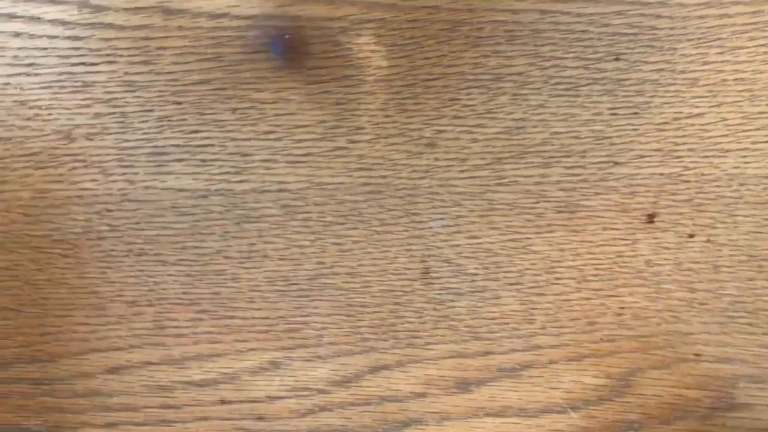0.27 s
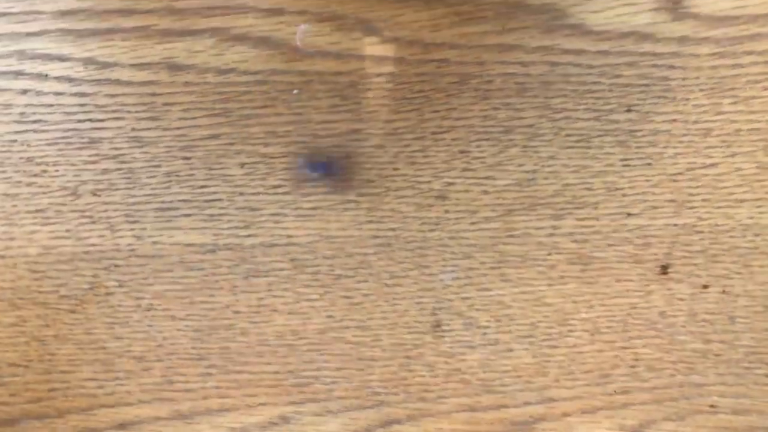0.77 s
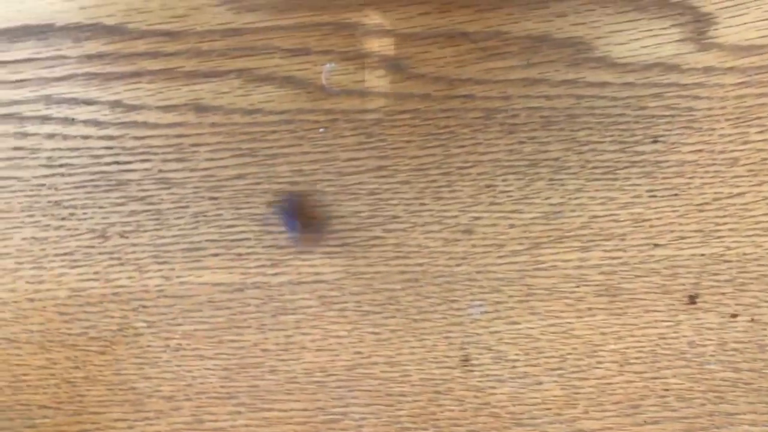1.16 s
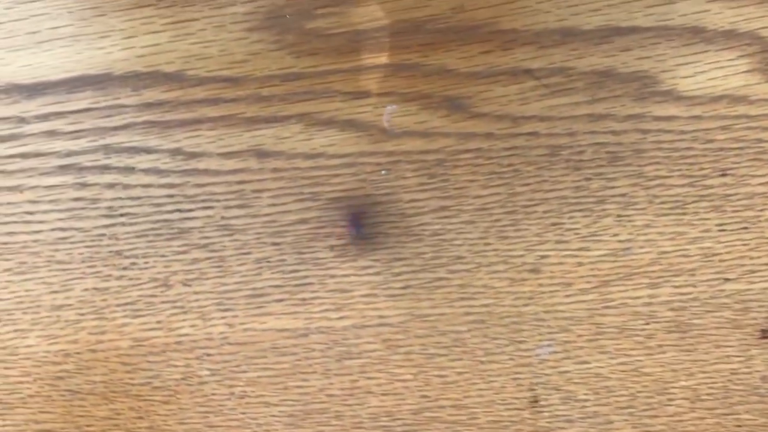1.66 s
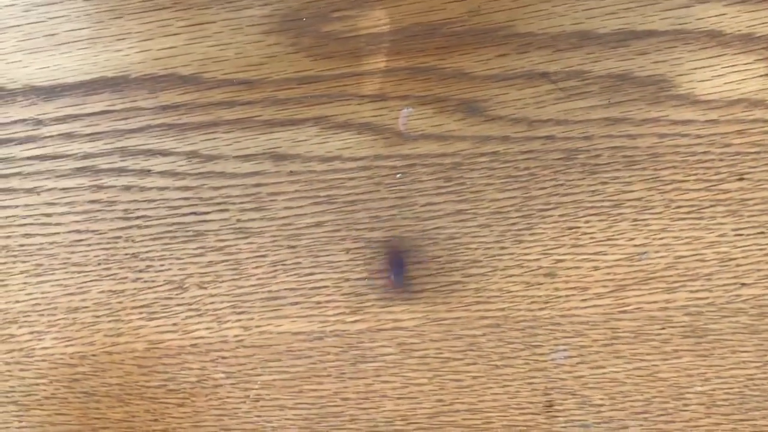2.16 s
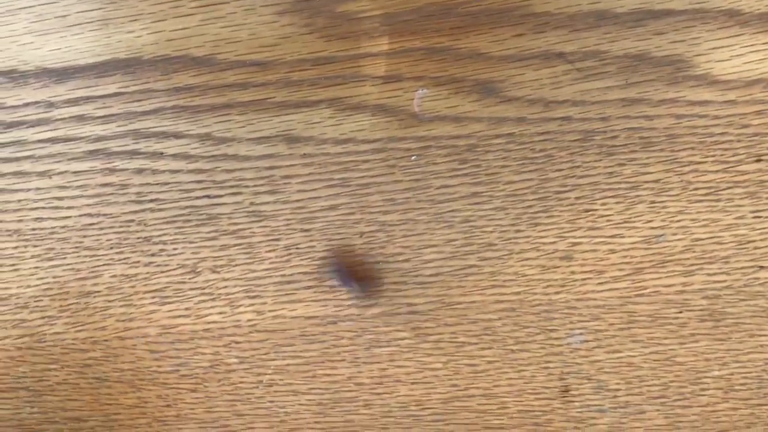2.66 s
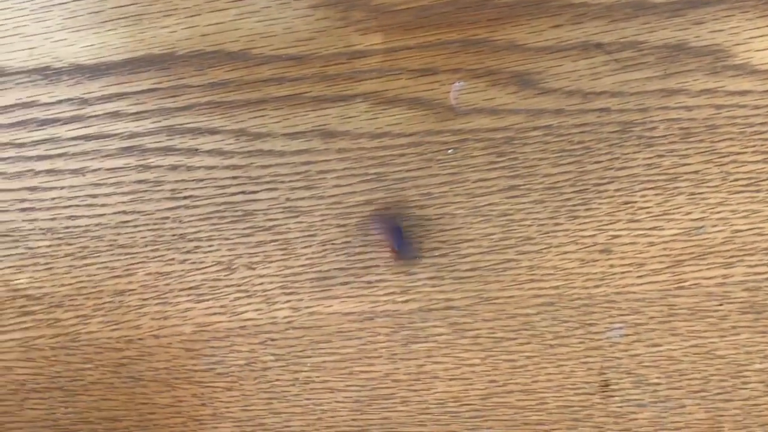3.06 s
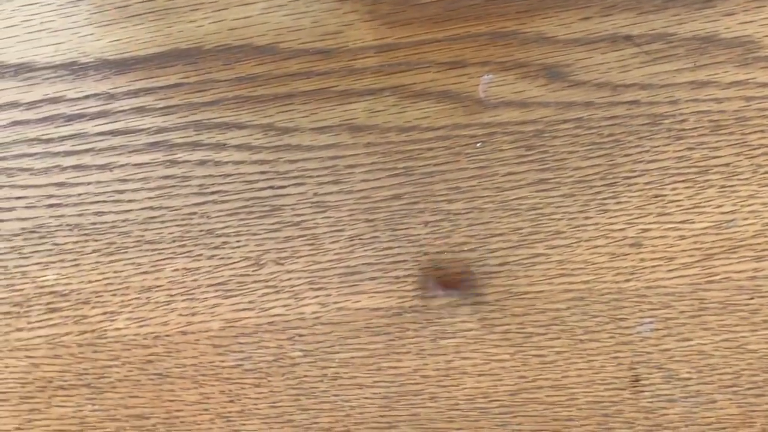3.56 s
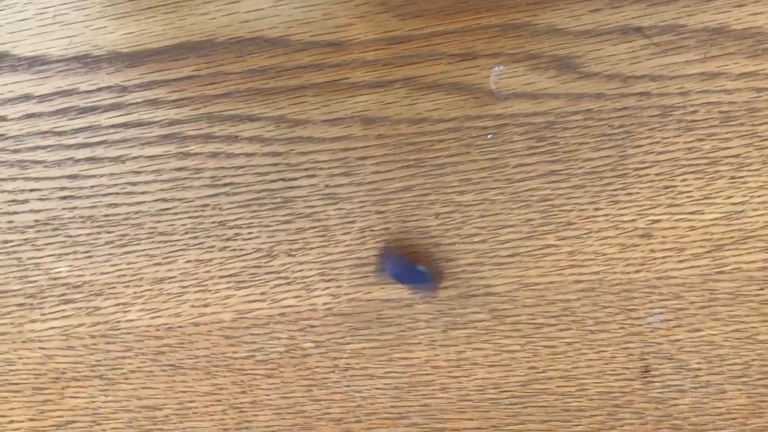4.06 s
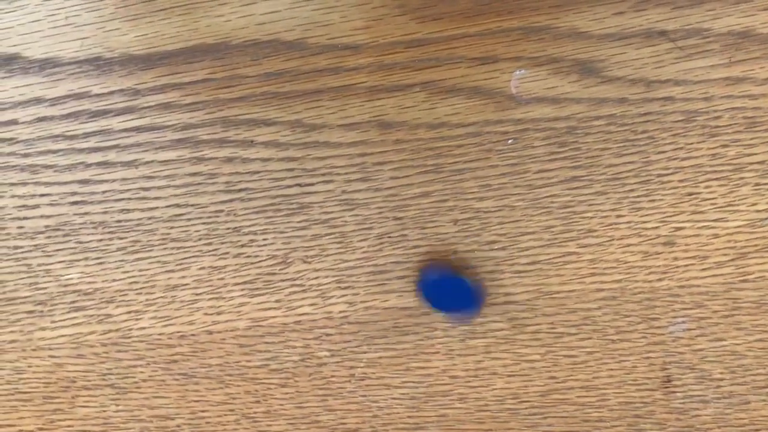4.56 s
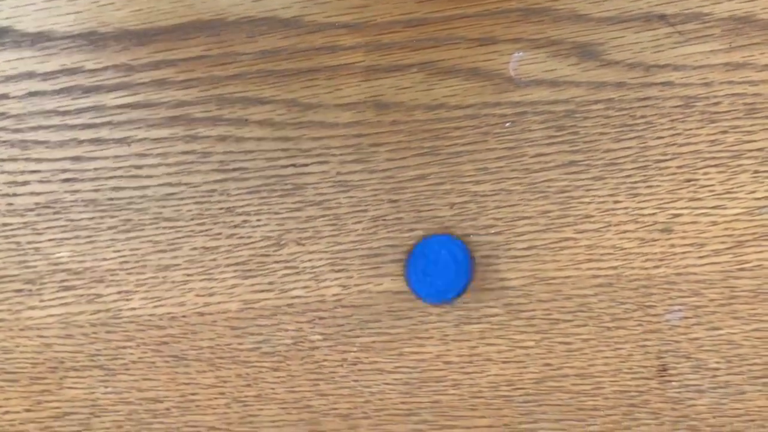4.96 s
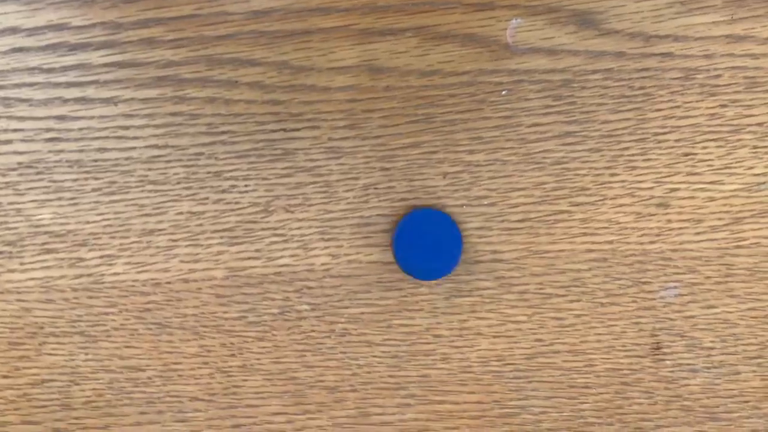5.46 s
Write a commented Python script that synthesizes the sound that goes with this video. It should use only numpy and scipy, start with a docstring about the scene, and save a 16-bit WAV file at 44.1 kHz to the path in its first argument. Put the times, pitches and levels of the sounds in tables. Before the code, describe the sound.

Close to the microphone, a spinning coin ticks and skips across a wooden table over a faint room rumble. The first woody knocks soften into scattered little clicks. Past the middle they grow stronger and closer together, merging into a continuous wobbling chatter that gets faster and brighter, with a very high metal ring, and is still rattling at the end.

```python
"""You hear a coin spinning on a wooden table, close by in a small, quiet room.
Its rim rolls and knocks on the wood grain, and the tabletop turns each touch into sound.
The rolling fades as the coin stands upright. Then, as it leans over, the touches come harder and
run into a quickening flutter, the rattle brightens and the coin's own high ring comes out."""
import sys
import numpy as np
from scipy import signal
from scipy.fft import rfft, irfft
from scipy.io import wavfile
from scipy.ndimage import uniform_filter1d

SR = 44100
rng = np.random.default_rng(int(sys.argv[2]) if len(sys.argv) > 2 else 0)


def to_wav(sig):
    """Store sig (one row per channel, or 1-D mono) as 16-bit WAV at the path in sys.argv[1].

    Samples outside -1..1 are clipped; the rate is SR.
    """
    pcm = np.clip(np.atleast_2d(sig), -1, 1) * 32767
    pcm = np.round(pcm).astype(np.int16)
    wavfile.write(sys.argv[1], SR, pcm.T)  # frames by channels


N = 251414

# The room's steady background. Each row: pitch in Hz, relative level in dB.
AIR_COLOUR = [(20, -24), (45, 4), (100, 6.5), (300, -2.5), (600, -1), (720, 4.5), (900, -9.5),
              (1500, -11.5), (4000, -15.5), (8000, -21), (10400, -23), (13000, -21), (15800, -24)]
# How strongly the rim rolls. Each row: time in seconds, level in dB.
ROLL_LEVEL = [(0.0, -44.5), (0.1, -50.5), (0.5, -51), (0.8, -55.5), (0.93, -51), (1.02, -58), (1.18, -60),
              (1.4, -78.5), (1.95, -77), (2.2, -61.5), (2.65, -76), (2.85, -72), (3.45, -82), (3.65, -58.5),
              (4.1, -52), (4.33, -44), (4.6, -42.5), (4.95, -39.5), (5.7, -39)]
# Leaning makes touches harder, so brighter. Each row: time in seconds, hardness of a firm touch in dB.
LEAN_HARDNESS = [(0.0, -9), (1.0, -9), (2.3, -9.5), (3.5, -9), (4.0, -6.5), (4.63, -3), (5.0, -1.5),
                 (5.7, 0.5)]
# How hardness colours a touch. Each row: pitch in Hz, dB added for each dB of hardness.
HARDNESS_COLOUR = [(100, -0.33), (250, -0.41), (600, -0.6867), (1300, 0), (2000, 0.45), (2800, 1.58),
                   (4000, 2.2), (6500, 4), (10000, 1.8), (14000, 2.5)]
# The tabletop's broad answer to a hard touch. Each row: pitch in Hz, gain in dB.
TABLE_COLOUR = [(30, -41.5), (90, 0.5), (130, 2.5), (400, 9.5), (650, 5.5), (1300, 8), (2500, 16.5),
                (4400, 8.5), (5600, -8.5), (7500, -17), (10500, -27), (15600, -25.5)]
# Pitches that the tabletop and nearby room echoes boost or swallow.
# Each row: pitch in Hz, width in Hz, gain in dB.
TABLE_AND_ROOM_RESONANCES = [(155, 25, 7), (185, 8.2, -11.5), (202.8, 14, 9.5), (355, 34, 1.5),
                             (392.4, 30, -3), (451, 46, 6), (497.3, 25.2, -23.5), (515, 19, 4),
                             (579, 49, -5.5), (649, 18, 5), (694.4, 47, -13), (725, 14, 9.5),
                             (736, 23, -4.5), (865, 73, 3.5), (948, 8, 7.5), (982, 23, -12), (996, 38, 7),
                             (1049, 14, 2.5), (1100, 18, 2.5), (1101, 12, -4), (1299, 109, 10),
                             (1486, 42, 7.5), (1504, 50, 0.5), (1621, 18, 4), (1842, 16.7, 3.5),
                             (2033, 147, -6.5), (2509, 42, 7.5), (2640, 403, -11.5), (2736, 143, 11.5),
                             (3018, 68, 4.5), (3512, 112, -11.5), (4831, 135, -12), (4380, 280, 1.5),
                             (5420, 170, 8)]
# Peaks and dips of the coin's metal ring. Each row: pitch in Hz, width in Hz, full gain in dB.
COIN_RESONANCES = [(12500, 174, 26.5), (13200, 500, -4), (13960, 1000, 13.5), (15200, 500, -7)]
# How waves die away in the tabletop. Each row: pitch in Hz, seconds to fade by 60 dB.
TABLE_FADE = [(120, 0.086), (400, 0.1), (1300, 0.11), (2500, 0.049), (4500, 0.014), (12000, 0.04)]
# How the room's echo dies away. Each row: pitch in Hz, seconds to fade by 60 dB.
ROOM_FADE = [(150, 0.45), (1500, 0.36), (4000, 0.19), (12000, 0.32)]
# The rim catches on the wood. Each row: start in seconds, skipping time in seconds, knock level in dB.
RIM_CATCHES = [(0.024, 0.022, -24.5), (0.073, 0, -21), (0.119, 0.014, -6.5), (0.226, 0, -9.5),
               (0.239, 0.036, -9), (0.333, 0.0097, -8.5), (0.427, 0.0013, -12), (0.438, 0.00087, -6),
               (0.492, 0.00042, -14.5), (0.543, 0.012, -17.5), (0.603, 0.0018, -10), (0.657, 0.014, -13.5),
               (0.715, 0, -17.5), (0.722, 0.001, -11), (0.774, 0.013, -22), (0.835, 0.015, -16),
               (0.893, 0, -21), (0.902, 0.026, -12), (0.961, 0, -19), (1.018, 0.01, -19.5),
               (1.074, 0.015, -25), (1.139, 0.017, -18), (1.215, 0.014, -25), (1.273, 0.011, -25.5),
               (1.348, 0.0011, -25), (1.578, 0.00058, -31), (1.678, 0.03, -35.5), (1.771, 0.00097, -26.5),
               (1.852, 0.0011, -18.5), (1.998, 0.0053, -13), (2.071, 0.0002, -22), (2.082, 0, -14),
               (2.158, 0.00095, -27), (2.197, 0.0019, -24.5), (2.233, 0.00039, -21), (2.298, 0.00011, -22),
               (2.312, 0.00065, -12.5), (2.382, 0, -21), (2.392, 0.011, -11.5), (2.47, 0.00019, -19),
               (2.487, 0.0084, -15), (2.574, 0.0014, -25.5), (2.644, 0.031, -21), (2.735, 0, -25),
               (2.752, 0.002, -17.5), (2.932, 0.0031, -28.5), (3.025, 0.027, -38.5), (3.136, 0, -28),
               (3.187, 0.01, -34), (3.229, 0.0021, -32), (3.32, 0.00041, -18.5), (3.413, 0.013, -25),
               (3.521, 0.034, -22.5), (3.61, 0.013, -23), (3.645, 0.0004, -14.5), (3.742, 0.00021, -11.5),
               (3.764, 0.00035, -12), (3.822, 0, -17), (3.843, 0.0013, -13), (3.859, 0.0058, -12),
               (3.954, 0, -18.5), (3.966, 0.024, -11), (4.06, 0.00059, -15.5), (4.076, 0.024, -13),
               (4.168, 0.00022, -13), (4.184, 0.00082, -9.5), (4.207, 0.013, -8), (4.281, 0, -19),
               (4.294, 0, -10.5), (4.305, 0.013, -8), (4.341, 0.0012, -21), (4.414, 0.013, -7),
               (4.442, 0, -7.5), (4.454, 0.00073, -9), (4.515, 0, -15), (4.525, 0.0097, -8)]
# The tone of the skidding rim's scratch. Each row: pitch in Hz, gain in dB.
SKID_COLOUR = [(1500, -35), (4000, 13), (5400, 7.5), (6800, 3), (8000, -7.5), (10500, -10), (15600, -4)]
# Hard slaps of the nearly flat coin. Each row: start in seconds, level in dB.
RIM_SLAPS = [(4.559, -6), (4.599, -15.5), (4.613, -11), (4.63, -10.5), (4.639, -10), (4.646, -9.5),
             (4.656, -9), (4.678, -7), (4.689, -7), (4.738, -6), (4.745, -7.5), (4.755, -9.5),
             (4.766, -7.5), (4.781, -7), (4.792, -9.5), (4.814, -10), (4.827, -9), (4.839, -10),
             (4.856, -11), (4.869, -10.5), (4.889, -6.5), (4.901, -11.5), (4.949, -11.5), (4.96, -14),
             (4.971, -6.5), (4.977, -7), (4.986, -4), (4.991, -10), (4.998, -6.5), (5.011, -7.5),
             (5.025, -10), (5.044, -10), (5.075, -9), (5.085, -9.5), (5.101, -8.5), (5.137, -8),
             (5.168, -8), (5.194, -10.5), (5.203, -7.5), (5.22, -5), (5.238, -8.5), (5.278, -5),
             (5.291, -5.5), (5.313, -10), (5.348, -10), (5.395, -8), (5.402, -12.5), (5.433, -10.5),
             (5.445, -7.5), (5.46, -5.5), (5.466, -8.5), (5.472, -7.5), (5.497, -8.5), (5.514, -10.5),
             (5.531, -8.5), (5.552, -9.5), (5.566, -6), (5.58, -8.5), (5.605, -10.5), (5.616, -7.5),
             (5.631, -7.5), (5.687, -7.5)]


def amp(db):
    """Turn decibels into a number to multiply by."""
    return 10 ** (np.asarray(db) / 20)


def at_time(rows, times):
    """Look up a table at these times, gliding between its rows."""
    return np.interp(times, *np.transpose(rows))


def at_pitch(rows, hz):
    """Look up a table at these pitches, with octaves evenly spaced."""
    row_hz, value = np.transpose(rows)
    return np.interp(np.log(hz + 1), np.log(row_hz + 1), value)


def sample_at(times):
    """The nearest sample to each time."""
    return np.clip(np.round(times * SR).astype(int), 0, N - 1)


def shaped_click(db, size=4096):
    """The quickest click that has these levels, from 0 Hz to half the sample rate."""
    log_gain = np.log(amp(np.r_[db, db[-2:0:-1]]))
    spectrum = np.exp(np.conj(signal.hilbert(log_gain)))
    return np.fft.ifft(spectrum).real[:size]


def room_air(level_db=-66):
    """The room rumbles and hisses softly throughout."""
    colour = amp(at_pitch(AIR_COLOUR, np.fft.rfftfreq(N, 1 / SR)))
    noise = irfft(rfft(rng.standard_normal(N)) * colour, N)
    return amp(level_db) * noise / noise.std()


def rolling(per_s=300, jitter=0.3945, spread_db=3.0, harder_db=1.5):
    """The rim ticks unevenly over the grain. Gives each touch's time, level and hardness."""
    slip, chance = rng.standard_normal((int(per_s * N / SR), 2)).T
    times = (np.arange(len(slip)) + jitter * slip) / per_s
    db = at_time(ROLL_LEVEL, times) + lull(times) + spread_db * np.clip(chance, -2, 2)
    db += 10 * np.log10(SR / per_s)  # one tick carries the energy of a whole gap between ticks
    return times, db, hardness_of(times, db) + harder_db


def lull(times, depth_db=-3, width_s=0.029):
    """The rim presses more lightly between its catches and slaps. Gives the drop in dB."""
    knock_s, skipping_s, _ = np.transpose(RIM_CATCHES)
    slap_s, _ = np.transpose(RIM_SLAPS)
    starts, ends = np.r_[knock_s, slap_s], np.r_[knock_s + skipping_s, slap_s]
    away_s = np.maximum(starts - times[:, None], times[:, None] - ends).min(1).clip(0)
    return depth_db * (1 - np.exp(-(away_s / width_s) ** 2))


def hardness_of(times, db, firm_db=-8.5, bite=0.47):
    """A touch is sharper when it is forceful and when the coin leans far over."""
    return at_time(LEAN_HARDNESS, times) + bite * (db - firm_db)


def strike(times, force, hardness, upright_db=-13, flat_db=0):
    """Each touch rings table and coin, coloured by nearby room echoes; harder ones sound brighter."""
    hz = np.fft.rfftfreq(8192, 1 / SR)
    table_and_room_db, coin_db = (
        sum(db / (1 + (2 * (hz - pitch) / width) ** 2) for pitch, width, db in rows)
        for rows in (TABLE_AND_ROOM_RESONANCES, COIN_RESONANCES))
    knock_db = at_pitch(TABLE_COLOUR, hz) + table_and_room_db
    grades = np.arange(-28, 9, 4)  # steps of hardness in dB; a touch blends the nearest two
    out = np.zeros(N)
    for grade in grades:
        share = np.interp(hardness, grades, grades == grade)
        # the upright coin's soft touches hardly bend it; lying over, it rings
        ring = np.interp(grade, [upright_db, flat_db], [0, 1])
        click = shaped_click(knock_db + ring * coin_db + grade * at_pitch(HARDNESS_COLOUR, hz))
        pushes = np.bincount(sample_at(times), force * share, N)
        out += signal.oaconvolve(pushes, click)[:N]
    return out


def table_thud(touches, hz=152.92, level_db=-2, fade_db_per_s=21):
    """The coin starts on a springy part of the table, which thuds low until the coin wanders off."""
    thud = signal.lfilter(*signal.iirpeak(hz, Q=3.7, fs=SR), touches)
    return thud * amp(level_db - fade_db_per_s * np.arange(N) / SR)


def echo_tail(fade, rise_share, direct_db, size=16384):
    """The direct sound arrives first, then a crowd of echoes builds up and dies away."""
    hz, times, noise = signal.stft(rng.choice([-1., 1.], size), SR, nperseg=64)
    age = times / at_pitch(fade, hz)[:, None]  # 1 means faded by 60 dB
    envelope = amp(-60 * age) * (1 - np.exp(-age / rise_share))
    echoes = signal.istft(noise * envelope, SR, nperseg=64)[1][:size]
    echoes /= np.linalg.norm(echoes)
    echoes[0] += amp(direct_db)
    # even out the tone, so the echoes spread a touch in time but keep its broad colour
    power = uniform_filter1d(abs(rfft(echoes)) ** 2, size=110)
    return signal.fftconvolve(echoes, shaped_click(-10 * np.log10(power + 1e-9)))[:size]


def wandering_echoes(sound, fade, rise_share, direct_db, spots, spots_per_s=14):
    """The rim circles over spots on the table, and each spot has its own echoes."""
    place = np.arange(N) / SR * spots_per_s
    out = np.zeros(N)
    for spot in range(spots):
        away = abs((place - spot + spots / 2) % spots - spots / 2)
        near = np.clip(.5 + 10 * (.5 - away), 0, 1)
        out += signal.oaconvolve(sound * near, echo_tail(fade, rise_share, direct_db))[:N]
    return out


def rim_catch(knock_s, skipping_s, knock_db, gap_s=0.012, jitter_s=0.001, fade_db_per_s=20):
    """The rim catches on the wood with one hard knock, and may skip on for a moment."""
    delays = np.linspace(0, skipping_s, round(skipping_s / gap_s) + 1)[1:]
    slip, chance_db = rng.standard_normal((2, len(delays)))
    times = knock_s + np.r_[0, delays + jitter_s * slip]
    db = knock_db + np.r_[0, -2.5 - fade_db_per_s * delays + chance_db]  # skips are lighter
    hardness = hardness_of(times, db)
    hardness[1:] += 0.5  # and a little sharp for their level
    return times, db, hardness


def graze(times, db, hardness, before_s, after_s, lighter_db, harder_db, count):
    """The rim slides a little as it lands, so a few light touches surround each blow."""
    offsets = rng.uniform(-before_s, after_s, (len(times), count))
    graze_times = (times[:, None] + offsets).ravel()
    return graze_times, np.repeat(db + lighter_db, count), np.repeat(hardness + harder_db, count)


def skid(times, db, level_db=-25.5, fade_db_per_s=1.5, scratch_s=0.0025):
    """The travelling coin skids: each blow has a gritty edge, which fades as the travel slows."""
    energy = np.bincount(sample_at(times), amp(db + level_db - fade_db_per_s * times) ** 2, N)
    keep = np.exp(-2 / (scratch_s * SR))  # share of the energy left after one sample
    envelope = np.sqrt(signal.lfilter([1 - keep], [1, -keep], energy + 1e-20))
    colour = shaped_click(at_pitch(SKID_COLOUR, np.fft.rfftfreq(8192, 1 / SR)))
    return signal.oaconvolve(rng.standard_normal(N) * envelope, colour)[:N]


def slaps():
    """The rim of the nearly flat coin comes down hard on uneven spots."""
    times, db = np.transpose(RIM_SLAPS)
    return times, db, hardness_of(times, db)


def flutter(start_s=4.58, first_per_s=78, speedup_per_s2=62, level_db=-13.5, harder_db=1.5):
    """The wobbling rim chatters on the wood without a break, faster and faster."""
    age = np.arange(N) / SR - start_s
    touch_count = np.cumsum((age > 0) * (first_per_s + speedup_per_s2 * age)) / SR
    beats = np.flatnonzero(np.diff(np.floor(touch_count)))
    slip, chance = rng.standard_normal((len(beats), 2)).T
    times = beats / SR + 0.06 * slip / first_per_s
    limp_db = 0.76 * (-1) ** np.arange(len(beats))  # every other touch is a little stronger
    db = level_db + 0.55 * lull(times) + limp_db + 1.2 * np.clip(chance, -2, 2)
    return times, db, hardness_of(times, db) + harder_db


def scene():
    """The rim's touches send waves to and fro in the tabletop, and then around the room."""
    catches = np.hstack([rim_catch(*row) for row in RIM_CATCHES])
    grazes = np.hstack([
        graze(*catches, before_s=0.005, after_s=0.007, lighter_db=-14.5, harder_db=1, count=3),
        graze(*slaps(), before_s=0.0015, after_s=0.003, lighter_db=-14, harder_db=2, count=2)])
    blows = np.hstack([catches, slaps(), grazes])
    times, db, hardness = np.hstack([rolling(), blows, flutter()])
    force = amp(db) * rng.choice([-1, 1], len(times))  # the rim pushes on a bump or drops off it
    touches = strike(times, force, hardness) + skid(*blows[:2])
    touches += table_thud(touches)
    table = wandering_echoes(touches, TABLE_FADE, rise_share=0.0035, direct_db=-4, spots=12)
    room = wandering_echoes(table, ROOM_FADE, rise_share=0.018, direct_db=9.5, spots=5)
    return (amp(-1.3) * room + room_air())[None]


def record(dry):
    """Cut away the very highest treble, above 15850 Hz."""
    low_pass = signal.firwin(511, 15850, window=("kaiser", 9), fs=SR)
    return signal.oaconvolve(dry, low_pass[None], "same")


dry = scene()
out = record(dry)
to_wav(out)
```